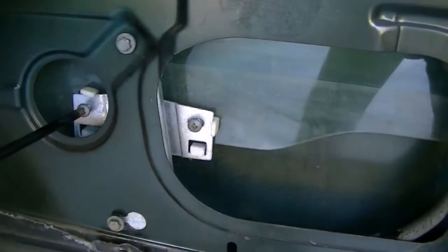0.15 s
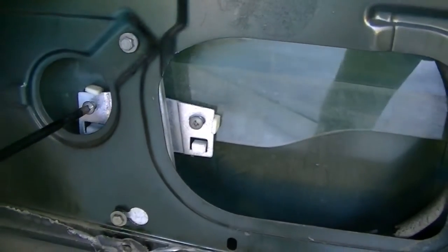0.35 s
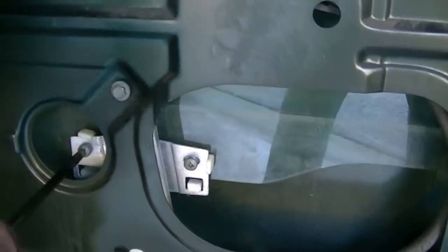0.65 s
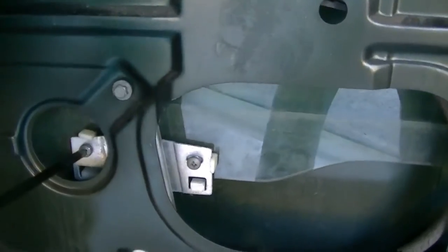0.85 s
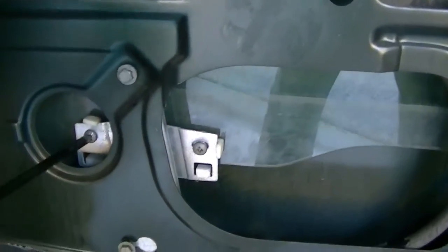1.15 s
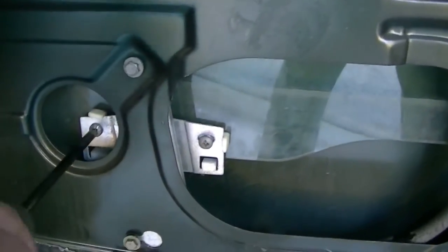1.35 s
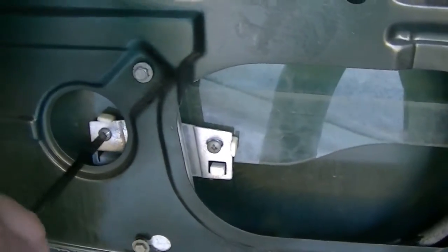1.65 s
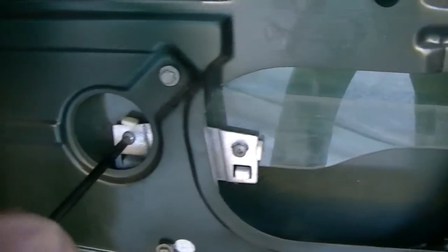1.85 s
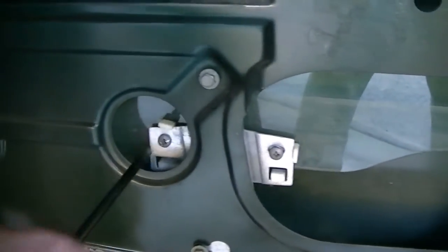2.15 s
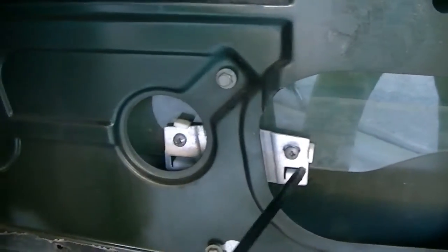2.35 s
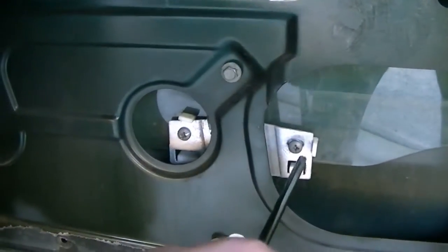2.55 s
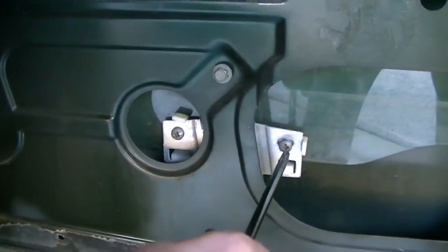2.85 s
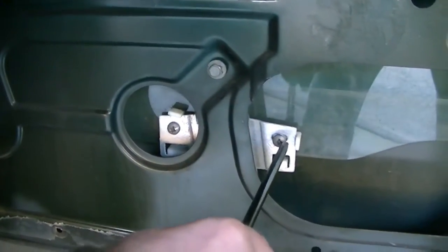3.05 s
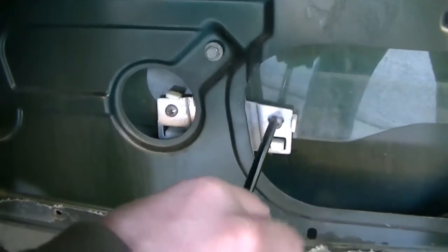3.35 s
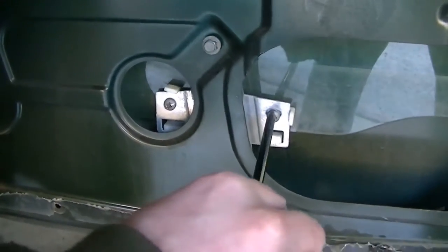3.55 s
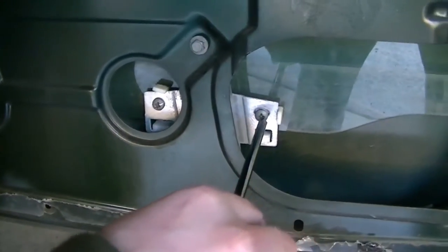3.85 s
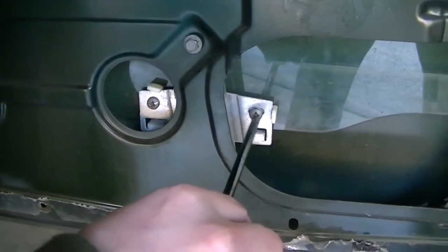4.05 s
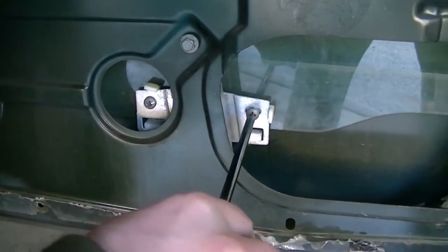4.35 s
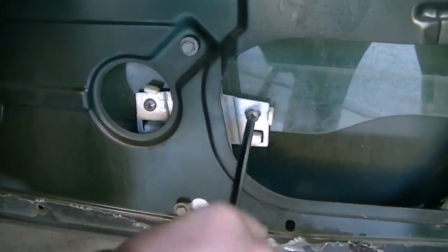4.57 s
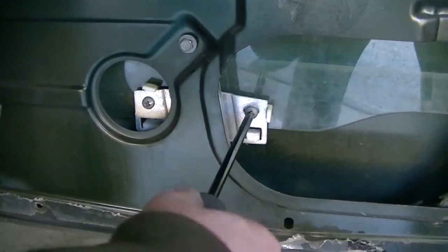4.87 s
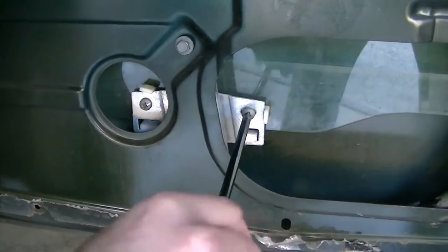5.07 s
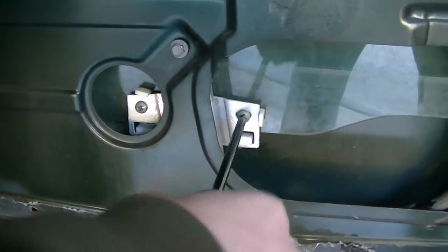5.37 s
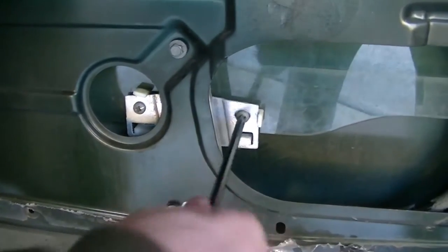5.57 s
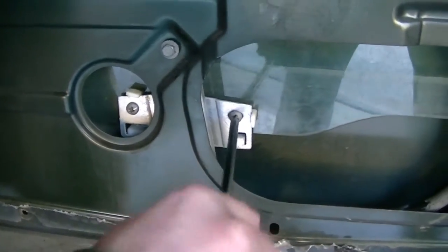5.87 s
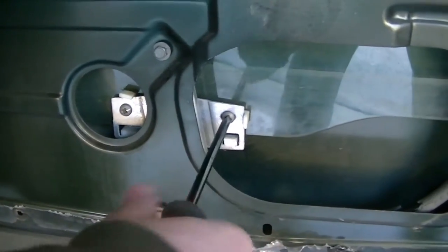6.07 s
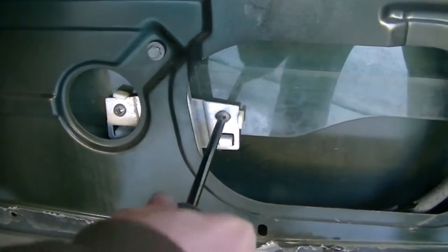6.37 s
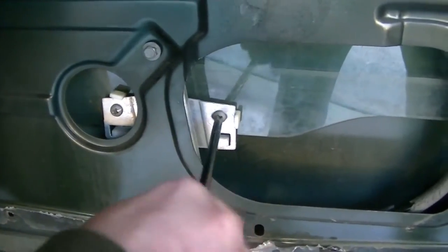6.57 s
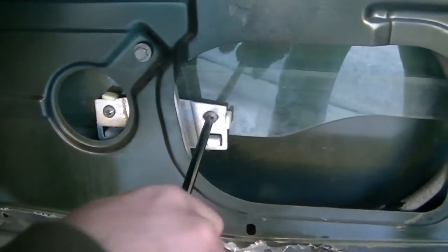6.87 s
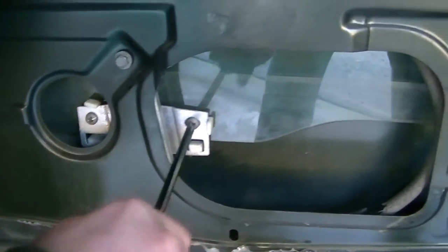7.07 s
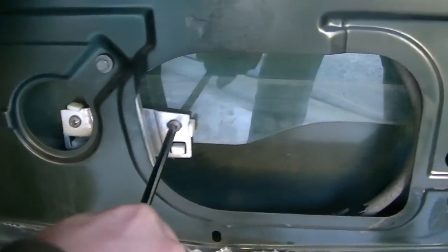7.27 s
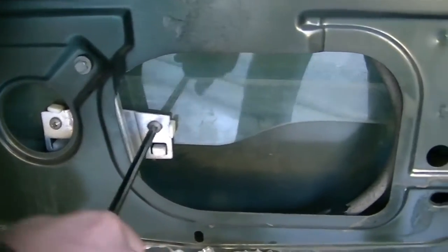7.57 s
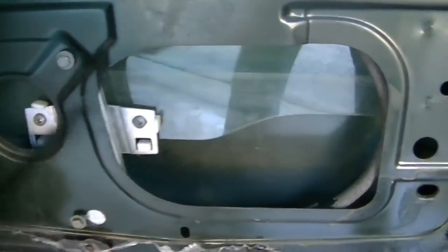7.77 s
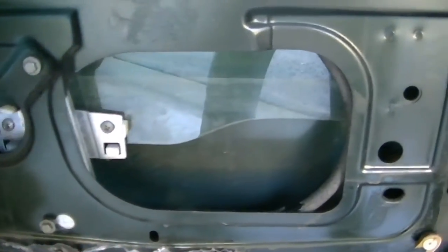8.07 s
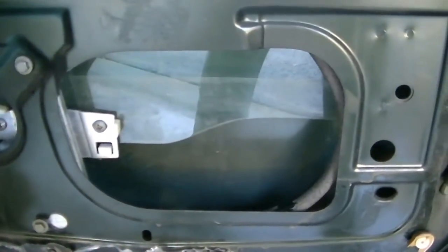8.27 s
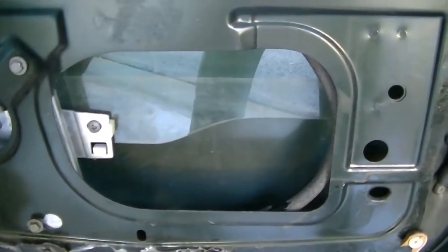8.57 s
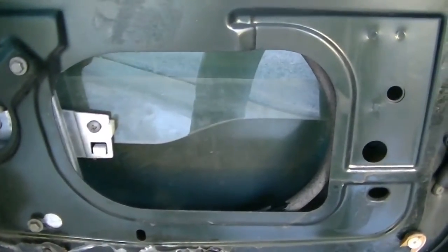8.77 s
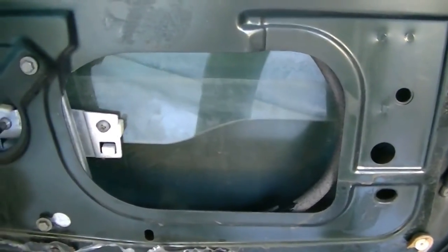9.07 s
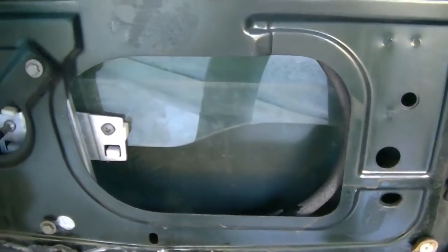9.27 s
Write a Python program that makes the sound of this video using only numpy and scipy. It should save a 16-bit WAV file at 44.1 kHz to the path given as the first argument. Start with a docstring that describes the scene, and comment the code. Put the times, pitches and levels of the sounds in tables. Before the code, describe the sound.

A screwdriver blade slips and knocks in screw heads, each hit a dry metal clack with a short boom from the hollow door panel. Gritty turning, loose-part rattle, brief rasps and soft hand swishes fill between. Strong at first, then a quiet gap, then a lighter second bout growing firmer, another pause, and isolated sharp knocks. Heard close, in mono, in a quiet garage.

```python
"""Knocks, clacks and grinding of a hand screwdriver on two window brackets inside a bare car door in a garage.
The blade slips and knocks in the screw heads: shaped noise bursts ring through metal modes, and the hollow
steel door booms and settles after each one. In spells of bearing on a screw or easing off it, random stick-slip
grains grind the thread and rub the hand on the grip while loose parts rattle. Near the end come a few separate
knocks. Short hisses are regrips, rasps are the blade dragging; steady coloured noise is the room."""
import sys
import numpy as np
from scipy import signal
from scipy.io import wavfile
from scipy.ndimage import uniform_filter1d

SR = 44100
rng = np.random.default_rng(int(sys.argv[2]) if len(sys.argv) > 2 else 0)


def dump_mix(stems):
    """Bounce the given channels to the path in sys.argv[1] as a 16-bit WAV at rate SR."""
    frames = np.atleast_2d(stems).T  # one column per channel
    limited = np.clip(frames, -1, 1)  # hard clip at full scale
    pcm = np.round(limited * 32767).astype(np.int16)
    wavfile.write(sys.argv[1], SR, pcm)


N = 415422  # length in samples

# Knocks of the blade. Each row: time in seconds, force in dB, hardness of the contact in dB,
# ring of the loose bracket in dB; 0 is the usual hardness and ring.
KNOCKS = [(0.001, -24.5, 1, -2), (0.126, -29, 1.5, -18), (0.303, -25, -4, -3), (0.342, -37, 15.5, -6),
          (0.432, -37.5, -19, 14), (0.472, -25, -8, 1.5), (0.596, -20, -2, -0.5), (0.748, -33.5, 4, 5.5),
          (0.78, -36, -10.5, 15.5), (0.861, -14, -6, -8.5), (0.878, -28, -1.5, 2.5), (0.914, -25, -24, 5),
          (1.032, -16, -0.5, -0.5), (1.063, -34, -20, -18), (1.099, -36.5, -6.5, 15.5),
          (1.128, -26.5, 3, 3), (1.187, -21, -17, 3), (1.225, -26.5, 14.5, -4), (1.263, -27, 6, -3.5),
          (1.365, -23, -7, -2), (1.451, -25, 7.5, 2), (1.529, -14.5, -3, -9.5), (1.593, -30.5, -8, 9),
          (1.63, -27.5, -3.5, 1), (1.664, -32.5, 2.5, 2.5), (1.781, -19, 3.5, 4.5),
          (1.845, -18, -5.5, -7.5), (1.98, -37, -25, 11), (2.089, -47.5, -14, 13), (2.173, -46, 10, 0.5),
          (2.224, -27.5, -8, -18), (2.855, -33, 13.5, 6), (2.988, -35, -9.5, 2), (3.089, -38, -6, 0),
          (3.194, -30, 5, 2.5), (3.248, -28.5, -8.5, 1), (3.316, -37, 8, -2), (3.331, -30.5, 13.5, -1),
          (3.365, -31, -1, 9.5), (3.539, -43.5, -3, -4), (3.677, -28, 0, -10), (3.781, -28, 0, 10),
          (3.917, -42, 2.5, -2), (4.143, -31.5, 12.5, -2.5), (4.152, -24, 20, -4), (4.28, -27, -7.5, 3.5),
          (4.436, -19, 20, -5), (4.706, -22.5, -2.5, -8), (4.728, -16, -3.5, 0), (4.748, -26, 8, -4),
          (4.872, -32.5, -6, -0.5), (4.999, -33.5, -5.5, 4.5), (5.171, -31.5, 4, -10),
          (5.207, -38, 13, -4.5), (5.34, -39, -2, 6.5), (5.411, -37, 3, 6.5), (5.444, -49, 10, 8),
          (5.594, -24.5, -8, -3.5), (5.775, -37.5, -3, 8.5), (5.816, -38, 11.5, -2), (5.929, -26, 8.5, 4),
          (5.995, -29.5, -3, -13), (6.078, -35.5, -8, 7), (6.134, -32, 14.5, 3), (6.178, -30, 7, 5),
          (6.282, -27.5, 5.5, 8.5), (6.359, -20, -2.5, -7.5), (6.491, -27, 1, 10), (6.518, -33, 8, -2),
          (6.635, -18, -15, 8.5), (6.652, -38, 25.5, -4.5), (6.788, -20.5, -1, 4.5),
          (6.802, -17.5, 10, -4.5), (6.9, -28, 4, 10), (6.997, -24, -22, -3.5), (7.073, -26.5, -8, -3.5),
          (7.11, -30, -24, -2), (7.139, -42, 10, 4.5), (7.648, -31, 7, -2.5), (7.737, -30, -16, -2),
          (8.38, -28.5, -9.5, 9), (8.578, -23, 7, 4.5), (8.787, -31, 3.5, 9.5), (8.799, -19.5, 24, -4),
          (8.885, -29.5, -7.5, 5), (9.064, -39, -3, -5), (9.263, -20, 0.5, -3.5), (9.302, -31.5, 0, -6),
          (9.383, -21.5, -7.5, -5.5)]
# Registers of a knock: door boom, sheet metal, bracket clack, blade tick. Each row: upper edge in Hz,
# rise in seconds before the contact adds to it, ring t60 in seconds, tail in dB before any extra
# lingering, tail t60 in seconds.
REGISTERS = [(461, 0.0022, 0.24, -12, 0.55), (1290, 0.00047, 0.13, -20, 0.33),
             (3660, 0.0014, 0.082, -26, .45), (15000, 0.00025, 0.055, -29, 0.42)]
# How each register answers a knock. Each row: dB at unit force, share of the hardness, share of the ring.
RESPONSE = [(0, 0.036, 0.16), (-5, .3, 0.6), (-13, 0.81, 1), (-22, 0.98, 0)]
# Broad colour of the door. Each row: frequency in Hz, relative level in dB per Hz.
DOOR = [(25, -31.5), (55, -45.5), (85, -18), (120, -24), (190, -9), (260, -2), (450, -5.5), (750, -6.5),
        (1000, -15), (1250, -14.5), (1650, -14.5), (2050, -16), (2600, -18.5), (3700, -20.5), (5000, -26),
        (8000, -29), (10000, -32.5), (12500, -48.5), (16000, -65.5)]
# Panel modes of the door. Each row: frequency in Hz, width in Hz, lift in dB above the dense modes.
PANEL = [(155.6, 22, 5.5), (237.8, 72, 2.5), (266.8, 36, 5.5), (352.6, 8.4, 5.5), (455, 22, 6),
         (510, 33, 4.5), (627.4, 45, 9), (735, 24, 4), (916, 23, 4.5)]
# Modes of the two brackets and the rim of the access hole. Each row: frequency in Hz, width in Hz,
# lift in dB above the dense modes.
LEFT_BRACKET = [(965, 110, 5), (1635, 100, 7), (1787, 54, 6), (2890, 94, 4), (4200, 120, 1.5),
                (4240, 210, 6), (4930, 97, 12), (6200, 100, 4.5), (6760, 190, 6), (8700, 58, -18),
                (9800, 320, 7), (11400, 290, 11)]
RIGHT_BRACKET = [(861, 55, 5), (1055, 50, 6.3), (1534, 50, 7.1), (1597, 53, 7), (1693, 99, 4.7),
                 (2360, 25, 2.3), (2650, 27, 2.5), (2970, 81, 6.2), (3473, 70, 5.2), (5140, 36, 5.5),
                 (5500, 140, 3.6), (6000, 99, 8.9), (6800, 100, 3.5), (7400, 240, 4.7), (8820, 140, 2.2),
                 (9150, 220, 4.3), (11400, 420, 5.1)]
HOLE_RIM = [(302, 43, 9.7), (780, 62, 5.6), (990, 150, 8.4), (1860, 470, 4.8), (2140, 210, 12.7),
            (2400, 130, 8.3), (3465, 100, 7.8), (3900, 68, 4.3), (4230, 89, 5.5), (4240, 90, 5),
            (5020, 47, 9), (5400, 65, 9.9), (5580, 130, 5.6), (6498.3, 63, 9.2), (7350, 90, 3.5),
            (7270, 280, 9.5), (9100, 90, 7.2), (9560, 110, 6.4)]
# Where the screwdriver works. Each row: start in seconds, end in seconds, modes of the part,
# dulling in dB per octave above 5 kHz (negative brightens), extra lingering of the treble in dB.
PLACES = [(0, 2.6, LEFT_BRACKET, -5.5, 2.5), (2.6, 8, RIGHT_BRACKET, 0.4, 2), (8, 9.5, HOLE_RIM, 5.5, 2)]
# Spells of bearing on a screw, or of easing off it while the bracket shifts. Each row: start in seconds,
# end in seconds, pressure in dB, rubbing of the hand in dB.
SPELLS = [(0.0, 0.188, -40, -55), (0.293, 0.334, -41.5, -54), (.64, 0.814, -43.5, -52),
          (0.863, 1.046, -35.5, -55.5), (1.127, 1.662, -39.5, -54), (1.823, 1.926, -39.5, -66),
          (2.248, 2.312, -49, -81), (3.26, 4.24, -57.5, -65), (4.313, 4.891, -45.5, -59.5),
          (5.063, 5.853, -43.5, -53), (5.986, 6.3, -43, -54.5), (6.378, 7.162, -41, -84),
          (7.74, 7.79, -45, -61), (8.863, 8.93, -44, -69), (9.3, 9.42, -48, -76)]
# Colours of the thread, the hand and the sleeve. Each row: frequency in Hz, relative level in dB per Hz.
GRIND = [(60, -26), (150, 5), (270, 8.5), (600, 2), (1100, -7), (2000, -8.5), (4000, -29.5), (9000, -30),
         (16000, -42)]
RUB = [(500, -33.5), (2000, 5), (4000, 0.5), (6000, 1.5), (9700, -2), (11500, -12), (16000, -22)]
FIZZ = [(4000, -42), (9000, -6), (11000, 5.5), (13000, -4), (16000, -12)]
# The blade drags along the screw head, skids before a slip or scrapes out. Each row: middle in seconds,
# length in seconds, level in dB.
DRAGS = [(0.855, 0.023, -43), (1.19, 0.037, -36), (1.445, 0.018, -43), (2.187, 0.047, -49),
         (3.0, 0.055, -56), (3.262, 0.045, -45.5), (3.685, 0.04, -44.5), (4.134, 0.016, -38),
         (4.695, 0.03, -43), (6.628, 0.02, -42), (7.155, 0.061, -46), (7.703, 0.047, -39)]
# The hand slides round the grip for a new hold. Each row: middle in seconds, length in seconds, level in dB.
REGRIPS = [(0.069, 0.24, -56.5), (.235, 0.044, -51.5), (.52, 0.15, -54.5), (.68, 0.1, -50),
           (2.297, 0.051, -64), (2.367, 0.027, -55.5), (4.845, 0.094, -54), (5.083, 0.16, -60),
           (5.499, 0.075, -48.5), (5.875, 0.077, -51), (6.556, 0.09, -55), (7.865, 0.048, -58)]
# Colours of the drags, the regrips and the garage air. Each row: frequency in Hz, relative level in dB per Hz.
RASP = [(700, -15), (1600, -1), (2300, -1.5), (3200, 0.5), (4400, -10), (5500, -19), (9000, -17),
        (12000, -32), (16000, -64)]
SWISH = [(1000, -27), (2500, 0), (5000, -4.5), (8000, -0.5), (10000, -1), (11500, -6), (13000, -13),
         (16000, -17)]
AIR = [(25, -48), (50, -7), (85, 0.5), (120, 3.5), (300, -5), (700, -5.5), (1100, -10.5), (2000, -13.5),
       (3400, -15.5), (8000, -20.5), (11200, -28), (13000, -28.5), (16000, -50.5)]

CONTACT_S, HALVING_DB = 0.0024, 40  # contact time of a usual knock; the extra hardness that halves it
CONTACT_STRETCH = 0.58  # share of the contact time that slows the rise
SHARED_RING = 0.077  # gain of the ringing that all knocks on a part have in common
CHATTER_DB, REBOUND_SHARE = 1.5, 0.3  # depth of the buzz; gain of the blade's second touch
# The door settles back after a knock: shortest and longest delay, force, hardness.
SETTLE_MIN_S, SETTLE_MAX_S, SETTLE_DB, SETTLE_HARDNESS_DB = 0.02, 0.045, -14.5, -17.5
RATTLE_DB, RATTLE_SPREAD_DB, RATTLE_HARDNESS_DB = -1, 1, -6  # force above the pressure, spread, hardness
PRESS_S, RELAX_S = 0.16, 0.11  # time to bear down; time for the effort to fall to 37 percent
STROKES_PER_S, STROKE_DB = 2.9, 1.5  # the wrist works in strokes, which swell the grinding
GRAIN_T60_S = 0.056  # ring of each grain of the thread
FLUTTER_PER_S, FLUTTER_DB = 22, 1.5  # the skin catches and slides unevenly on the grip
SLEEVE_DB = -20.5  # sleeve against the hand
AIR_DB = -56.5  # rms level of the room
EDGE_HZ = 15900  # upper band limit


def knocks(blows, start, end, modes, dull_db, linger_db):
    """Knocks on one part: dense metal modes die fast, then linger in the door cavity and garage."""
    here = [row for row in blows if start <= row[0] < end]
    s, force, hardness, loose = np.transpose(here)
    count = len(s)
    out = np.zeros(N)
    t = np.arange(int(0.5 * SR)) / SR
    gaps = rng.uniform(0.0006, 0.003, count)  # seconds until the blade touches again
    settles = rng.uniform(SETTLE_MIN_S, SETTLE_MAX_S, count)
    contact = CONTACT_S * 2 ** (-hardness[:, None] / HALVING_DB)

    def metal_db(hz):
        """The struck part rings together with the panel that carries it."""
        octaves = np.log2(np.maximum(hz / 5000, 1))
        return resonances(hz, PANEL + modes) - dull_db * octaves

    for index, (_, rise, ring_t60, tail_db, tail_t60) in enumerate(REGISTERS):
        base_db, hard_share, ring_share = RESPONSE[index]
        shared = rng.standard_normal(len(t))
        fresh = rng.standard_normal((count, len(t)))
        # loose parts buzz: the level wavers over some 3 ms
        chatter = unit(uniform_filter1d(rng.standard_normal(fresh.shape), size=130, axis=1))
        ring = amp(-60 * t / ring_t60)
        tail = amp(tail_db + hard_share * linger_db - 60 * t / tail_t60)
        decay = np.hypot(ring, tail)
        swell = rise + CONTACT_STRETCH * contact  # a soft contact pushes for longer
        onset = 1 - np.exp(-(t / swell) ** 2)
        bursts = (SHARED_RING * shared + fresh) * amp(CHATTER_DB * chatter) * decay * onset
        rings = colour(bursts.ravel(), lambda hz: register_db(hz, index) + metal_db(hz))
        rings = rings.reshape(bursts.shape)
        rings = np.array([rebound(burst, gap) for burst, gap in zip(rings, gaps)])
        # a knock's dB is its whole energy, counted over 25 ms
        energy = np.sum(rings ** 2, axis=1, keepdims=True)
        rings /= np.sqrt(energy / (SR / 40))
        blow_db = base_db + force + hard_share * hardness + ring_share * loose
        settle_db = base_db + force + SETTLE_DB + hard_share * SETTLE_HARDNESS_DB
        for k in range(count):
            add(out, s[k] - 0.002, amp(blow_db[k]) * rings[k])  # the swell starts 2 ms early
            # another knock's ring keeps the settling from being a plain echo
            add(out, s[k] + settles[k], amp(settle_db[k]) * rings[k - 1])
    return out


def rebound(burst, gap_s):
    """The blade strikes again a moment later, which gives each knock a lumpy colour of its own."""
    second = np.pad(burst, (round(gap_s * SR), 0))[:len(burst)]
    return burst + REBOUND_SHARE * second


def register_db(hz, index):
    """One register of the door's broad colour, with steep skirts."""
    edges = [row[0] for row in REGISTERS]
    low_skirt = (edges[index - 1] / (hz + 1)) ** 10 if index else 0
    high_skirt = (hz / edges[index]) ** 9 if index < len(edges) - 1 else 0
    return read(DOOR, hz) - 10 * np.log10(1 + low_skirt + high_skirt)


def resonances(hz, modes):
    """Lift in dB that a set of modes gives at each frequency."""
    return sum(db / (1 + (2 * (hz - f) / width) ** 2) for f, width, db in modes)


def rattles(pressure, count=28):
    """Small knocks of loose parts at random moments, following the pressure; same columns as KNOCKS."""
    s = (np.arange(count) + rng.random(count)) / count * (N - 1) / SR
    spread = np.clip(rng.standard_normal((count, 3)), -2, 2)
    force, hardness, ring = RATTLE_SPREAD_DB * spread.T
    pressure_db = 20 * np.log10(pressure[(s * SR).astype(int)] + 1e-6)
    return np.transpose([s, pressure_db + RATTLE_DB + force, RATTLE_HARDNESS_DB + hardness, ring])


def thread_grind(pressure):
    """The thread grinds into the door: ringing stick-slip grains, swelling with the wrist's strokes."""
    t = np.arange(SR // 8) / SR
    ring = rng.standard_normal(len(t)) * amp(-60 * t / GRAIN_T60_S)
    grains = signal.oaconvolve(slips(300, 2.0), ring)[:N]

    def thread_db(hz):
        """Grinding colour through the panel and a bracket that the pressure damps to half its lift."""
        return read(GRIND, hz) + resonances(hz, PANEL) + resonances(hz, RIGHT_BRACKET) / 2

    return unit(colour(grains, thread_db)) * pressure * waver(STROKES_PER_S, STROKE_DB)


def hand_rub(rubbing):
    """Skin and sleeve rub on the grip as dense stick-slip hiss with an uneven flutter."""
    hand = wander(colour(slips(9000, 0.88), lambda hz: read(RUB, hz)), patchy_db=1.0)
    sleeve = wander(colour(slips(9000, 1.8), lambda hz: read(FIZZ, hz)), patchy_db=3.0)
    return rubbing * waver(FLUTTER_PER_S, FLUTTER_DB) * (hand + sleeve * amp(SLEEVE_DB))


def effort(column):
    """Gain that rises ahead of each spell of bearing on a screw or easing off it, holds, then dies away."""
    t = np.arange(N) / SR
    gains = []
    for row in SPELLS:
        press = np.clip((t - row[0]) / PRESS_S + 1, 0, 1)
        relax = np.exp(-np.maximum(t - row[1], 0) / RELAX_S)
        gains.append(amp(row[column]) * press * relax)
    return np.max(gains, axis=0)


def blade_drags():
    """The blade rasps along the screw head in brief runs of stick-slip."""
    return strokes(DRAGS, RASP, per_s=5400, spread_db=2.5)


def regrips():
    """The hand swishes round the grip, its skin releasing in dense uneven slips."""
    return strokes(REGRIPS, SWISH, per_s=10000, spread_db=5.0)


def strokes(rows, spectrum, per_s, spread_db):
    """Short sliding strokes, each a swell of stick-slip noise."""
    t = np.arange(N) / SR
    slide = sum(amp(db) * np.exp(-(3 * (t - s) / length) ** 2) for s, length, db in rows)
    friction = colour(slips(per_s, spread_db), lambda hz: read(spectrum, hz))
    return slide * wander(friction, patchy_db=3.0)


def slips(per_s, spread_db):
    """Tiny stick-slip releases at random moments and of uneven size."""
    size = amp(spread_db * np.minimum(rng.exponential(1, N), 4))
    released = rng.random(N) < per_s / SR
    return unit(size * rng.standard_normal(N) * released)


def wander(x, patchy_db):
    """The rubbing contact shifts, so the hiss changes colour in patches of some 700 Hz by 80 ms."""
    z = signal.stft(x, nperseg=512)[2]
    patches = uniform_filter1d(rng.standard_normal(z.shape), size=8, axis=0)
    patches = uniform_filter1d(patches, size=14, axis=1)
    return unit(signal.istft(z * amp(patchy_db * unit(patches)))[1][:N])


def waver(per_s, depth_db):
    """A gain that swells at random, about per_s times a second."""
    heights = rng.standard_normal(1000)
    position = 2 * per_s * np.arange(N) / SR
    return amp(depth_db * np.interp(position, np.arange(len(heights)), heights))


def garage():
    """Quiet steady room noise."""
    return amp(AIR_DB) * unit(colour(rng.standard_normal(N), lambda hz: read(AIR, hz)))


def amp(db):
    """Decibels to gain."""
    return 10 ** (np.asarray(db) / 20)


def unit(x):
    """Scales to rms 1."""
    return x / np.sqrt(np.mean(x ** 2) + 1e-20)


def read(points, hz):
    """Reads a spectrum on a log-frequency axis."""
    f, value = np.transpose(points)
    return np.interp(np.log(hz + 1), np.log(f), value)


def add(mix, s, sound):
    """Adds a sound to the mix at time s, or at the very start if s is negative."""
    part = mix[max(round(s * SR), 0):][:len(sound)]
    part += sound[:len(part)]


def colour(x, db_of):
    """Causal (minimum-phase) filter whose gain in dB is db_of(Hz), floored at -110 dB."""
    hz = abs(np.fft.fftfreq(4096, 1 / SR))
    log_gain = np.log(amp(np.maximum(db_of(hz), -110)))
    taps = np.fft.ifft(np.exp(np.conj(signal.hilbert(log_gain)))).real
    return signal.oaconvolve(x, taps)[:len(x)]


def scene():
    """Knocks and rattles, friction of the thread, hand and blade, and the room noise, in mono."""
    pressure, rubbing = effort(column=2), effort(column=3)
    blows = np.vstack([KNOCKS, rattles(pressure)])
    metal = sum(knocks(blows, *place) for place in PLACES)
    friction = thread_grind(pressure) + hand_rub(rubbing) + blade_drags() + regrips()
    return (metal + friction + garage())[None]


def record(dry):
    """Soft overload on the hardest peaks, then the band limit."""
    held = dry / (1 + (dry / 0.95) ** 6) ** (1 / 6)
    lowpass = signal.firwin(511, EDGE_HZ, window=("kaiser", 9), fs=SR)
    return signal.oaconvolve(held, lowpass[None], "same")


dry = scene()
out = record(dry)
dump_mix(out)
```